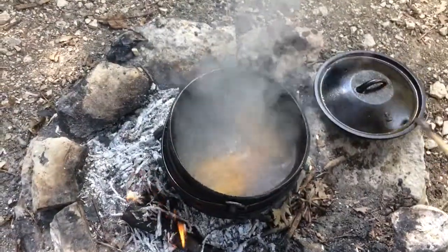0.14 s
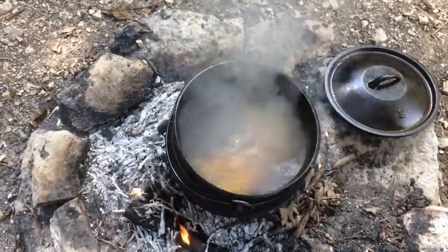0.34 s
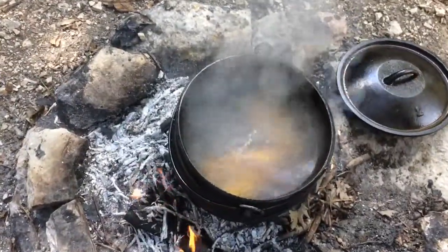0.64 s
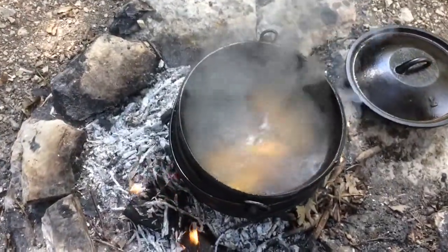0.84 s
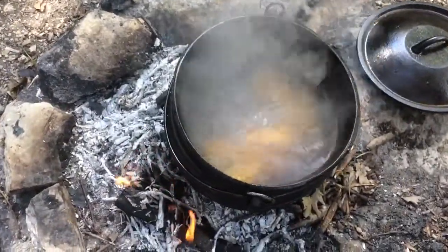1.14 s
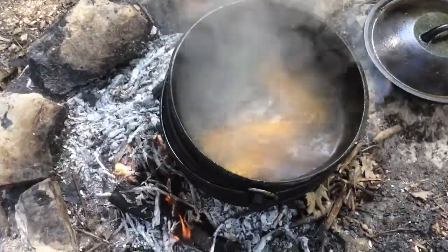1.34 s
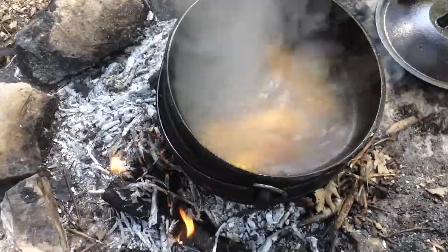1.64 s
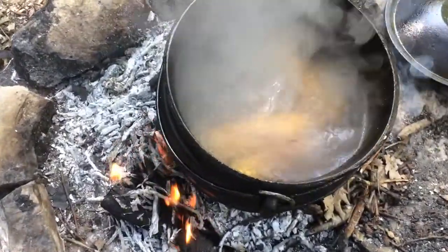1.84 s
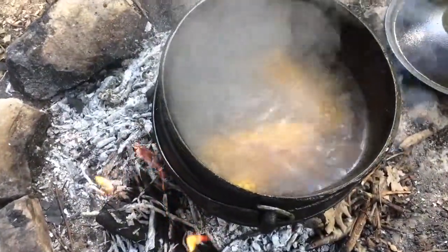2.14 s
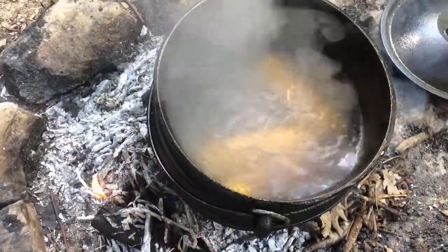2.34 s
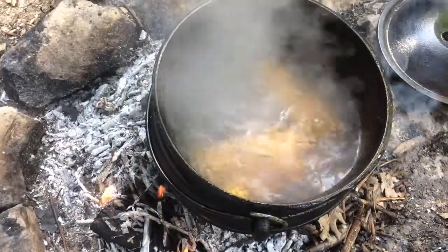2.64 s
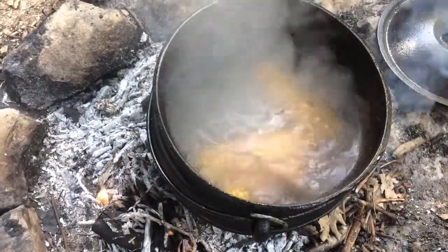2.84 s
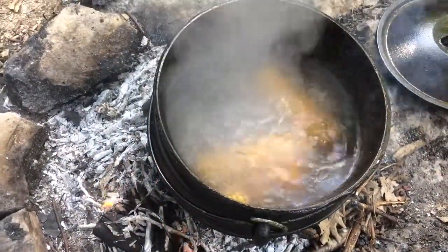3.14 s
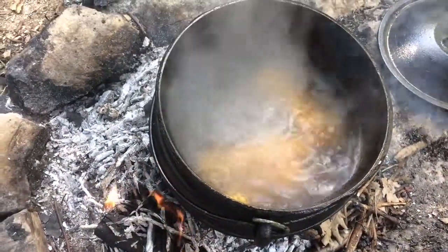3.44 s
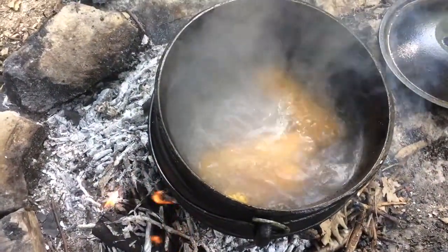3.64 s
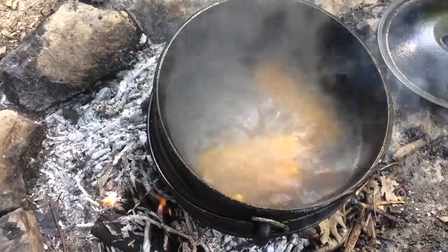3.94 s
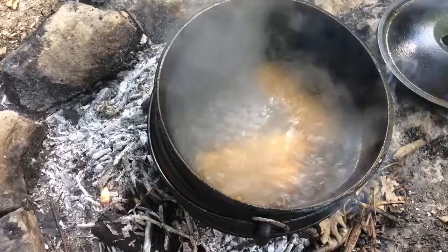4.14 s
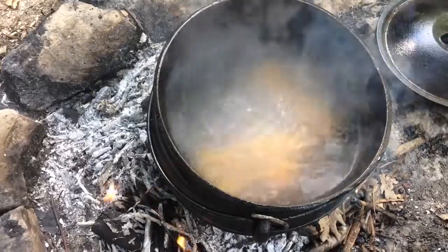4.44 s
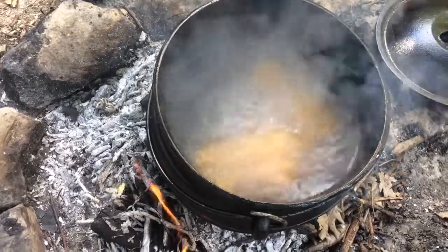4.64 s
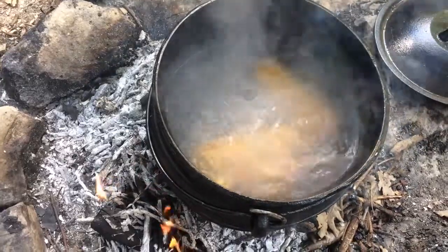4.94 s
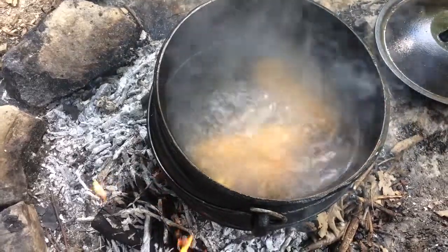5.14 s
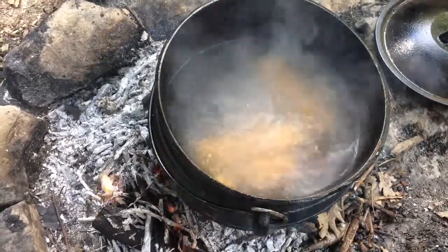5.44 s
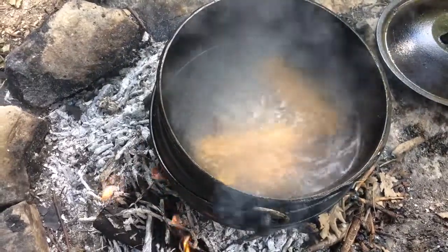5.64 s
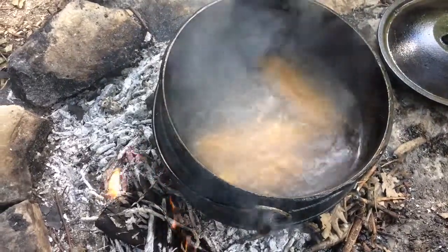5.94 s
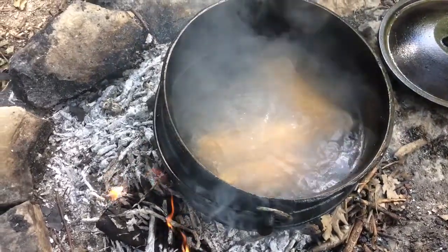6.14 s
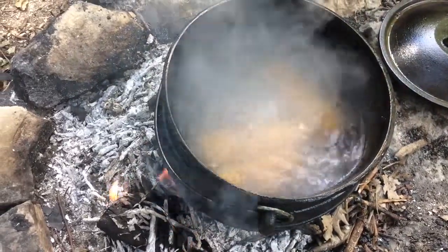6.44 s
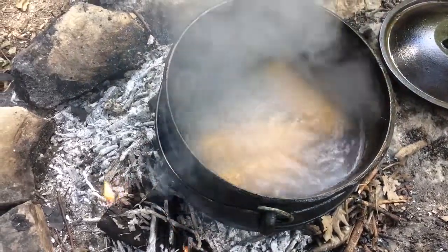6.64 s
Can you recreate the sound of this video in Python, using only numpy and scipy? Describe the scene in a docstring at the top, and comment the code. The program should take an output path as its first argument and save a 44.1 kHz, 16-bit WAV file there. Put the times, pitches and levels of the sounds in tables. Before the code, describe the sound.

Opening with a faint scrape and a bright, short iron clank, a heavy lid wobbles to rest in ever faster, softer knocks. After that, boiling takes over: quiet bubbling, irregular round gurgles and a steady hiss that grows slightly. Dry crackles from a wood fire pop at random, thickest near the end. Outdoors, close microphone, little echo.

```python
"""Stew pot over a wood fire

A cast-iron pot boils outdoors; its lid has just been set on the ground. Struck and rubbed iron modes
make a stick's scrape and the clanks; the rim rocks to rest in ever quicker knocks, with damped sines for
the air beneath. Big bubbles plop as gliding sines with wet noise; swarms of small resonators make the
churn and fizz. Noise bursts make the snaps and spits of the embers, over soft banded noise for the air."""
import sys
import numpy as np
from scipy import signal
from scipy.io import wavfile

SR = 44100
rng = np.random.default_rng(int(sys.argv[2]) if len(sys.argv) > 2 else 0)


def wav_out(sig):
    """Save sig, one row per channel (or a flat mono array), as 16-bit PCM at SR to the path in sys.argv[1]."""
    wavfile.write(sys.argv[1], SR, np.round(np.clip(np.atleast_2d(sig).T, -1, 1) * 32767).astype(np.int16))


N = 299439
T = np.arange(N) / SR

# blow on the lid handle, then jolts as the lid rocks: start_s, level_db
CLANKS = [(.1603, -42), (.1803, -18.5), (.4545, -56), (.707, -68)]


def from_db(db):
    """Decibels to gain."""
    return 10 ** (np.asarray(db) / 20)


def rms_one(x):
    """Scale to unit rms."""
    return x / np.sqrt(np.mean(x ** 2) + 1e-20)


def in_time(rows):
    """Level rows (start_s, level_db) joined by straight lines."""
    start_s, level_db = np.transpose(rows)
    return np.interp(T, start_s, level_db)


def at_hz(points, hz):
    """Read a spectrum on a log-frequency axis."""
    point_hz, level_db = np.transpose(points)
    return np.interp(np.log(hz), np.log(point_hz), level_db)


def add(out, start_s, sound):
    """Mix a sound in at its start time."""
    i = max(0, round(start_s * SR))
    out[i:i + len(sound)] += sound[:N - i]


def band(x, low_hz, high_hz):
    """Causal band-pass, edges kept within the usable range."""
    edges_hz = np.clip([low_hz, high_hz], [10, 20], [.42 * SR, .45 * SR])
    sos = signal.butter(2, edges_hz, "band", fs=SR, output="sos")
    return signal.sosfilt(sos, x + 1e-18)  # offset avoids denormals


def drift(rate_hz):
    """Slow random curve of unit rms: noise through a double pole, one point per 40 samples."""
    r = np.exp(-80 * np.pi * rate_hz / SR)
    noise = rng.standard_normal(N // 40 + 2002)
    slow = signal.lfilter([1], [1, -2 * r, r * r], noise)[2000:]  # drop the settling
    return np.interp(np.arange(N) / 40, np.arange(len(slow)), rms_one(slow))


def fade(t, t60_s):
    """Exponential decay, 60 dB in t60_s."""
    return np.exp(-np.log(1000) * t / max(t60_s, 1e-4))


def ring(force, hz, t60_s):
    """One mode as a two-pole resonator: a unit click starts a decaying sine of height 1."""
    r, w = fade(1 / SR, t60_s), 2 * np.pi * hz / SR
    return signal.lfilter([0, np.sin(w)], [1, -2 * r * np.cos(w), r * r], force + 1e-18)


def clicks(per_s, spread_db):
    """Random clicks of either sign, most small and a few large."""
    size = from_db(spread_db * np.minimum(rng.exponential(1, N), 2.8))
    return size * rng.choice([-1, 1], N) * (rng.random(N) < per_s / SR)


def swarm_voice(hz, per_s, spread_db, cycles):
    """Random clicks, differentiated, set one resonator ringing for some cycles."""
    force = np.diff(clicks(per_s, spread_db), prepend=0)
    return ring(force, hz, cycles / hz)


def burst(low_hz, high_hz, t60_s):
    """Dying puff of band noise, scaled to an rms of about 1 at its start."""
    envelope = fade(T[:SR // 6], t60_s)
    noise = rng.standard_normal(len(envelope)) * envelope
    puff = band(noise, low_hz, max(high_hz, 1.2 * low_hz))
    return puff * np.sqrt(np.sum(envelope ** 2) / np.sum(puff ** 2))


def wash(colour, patchy_db):
    """Smooth noise in half-octave bands, each level wavering by patchy_db rms."""
    out, white = np.zeros(N), rng.standard_normal((2, N))
    edges_hz = np.geomspace(22, 17000, 20)
    for k, (low_hz, high_hz) in enumerate(zip(edges_hz, edges_hz[1:])):
        level_db = at_hz(colour, np.sqrt(low_hz * high_hz)) + patchy_db * drift(rate_hz=6.2)
        out += from_db(level_db) * band(white[k % 2], low_hz, high_hz)  # neighbours use separate noise
    return rms_one(out)


def bubbles(colour, low_hz, high_hz, per_s, spread_db, cycles, clump_db, count):
    """Swarm of small bubbles of many sizes, each ringing a few cycles, the whole swelling in clumps."""
    out, surge = np.zeros(N), from_db(clump_db * drift(rate_hz=22))
    for hz in np.geomspace(low_hz, min(high_hz, .45 * SR), count):
        voice = rms_one(swarm_voice(hz, per_s / count, spread_db, cycles))
        out += from_db(at_hz(colour, hz)) * np.sqrt(hz) * voice  # colour is per Hz
    return rms_one(out * surge)


def rocking(count=17):
    """Rim knocks as (start_s, level_db): two to a swing, the swings ever shorter and softer."""
    first_swing_s, keep_share, soil_drag_s = .162, .9374, .00086
    first_db, fade_db = -33, 17.5  # loss by the last swing, slow at first and then steep
    rebound_share, rebound_db = .37, -4.5  # far side of the rim: this far into the swing, softer
    k = np.arange(count)
    swing_s = first_swing_s * keep_share ** k - soil_drag_s * k
    start_s = np.cumsum(swing_s) - swing_s
    level_db = first_db - fade_db * (k / k[-1]) ** 2
    return [*zip(start_s, level_db), *zip(start_s + rebound_share * swing_s, level_db + rebound_db)]


def blows(rows, vary_db):
    """A click per row, its strength varying with the point of contact."""
    force = np.zeros(N)
    for (start_s, level_db), luck in zip(rows, rng.standard_normal(len(rows))):
        add(force, start_s, from_db([level_db + vary_db * luck]))
    return force


def lid(low_cut_hz=200):
    """Handle blows, rim knocks and the rubbing stick reach the same iron modes with their own weights."""
    # iron lid modes in close pairs: pitch_hz, t60_s, handle_blow_db, rim_knock_db, rub_db
    lid_modes = [(1023, .09, -16, -32, -30), (1680, .05, -22, -40, -30), (1880, .05, -13, -34, -30),
                 (1761, .15, -9.5, -26, -17), (1763, .5, -26, -35, -13), (2256, .45, -31, -38, -7),
                 (2277, .2, -2.5, -23, -22), (2292, .3, -24, -34, -30), (2746, .6, -26, -42, -15),
                 (2763, .15, -12, -36, -20), (2989, .29, -14, -42, -24), (3012, .1, -10, -39, -30),
                 (3082, .07, -12, -45, -30), (3353, .13, -21, -50, -30), (3385, .29, -12, -47, -16),
                 (3950, .09, -27, -52, -16), (4027, .25, -27, -55, -14), (4318, .17, -18, -54, -22),
                 (5002, .35, -50, -62, -6), (5893, .35, -48, -62, -5), (6935, .25, -36, -62, -15),
                 (7052, .22, -35, -62, -24), (7910, .3, -48, -62, -10), (9663, .25, -50, -62, -10)]
    # stick sliding along the handle: start_s, level_db
    scrape_rows = [(0, -41), (.04, -51), (.07, -39.5), (.11, -65), (.15, -36), (.18, -83)]
    out, knocks = np.zeros(N), rocking()
    pressure = from_db(in_time(scrape_rows)) * (T < scrape_rows[-1][0])
    for k, (hz, t60_s, handle_db, rim_db, rub_db) in enumerate(lid_modes):
        force = from_db(handle_db) * blows(CLANKS, vary_db=1.0)
        force += from_db(rim_db) * blows(knocks, vary_db=4.0)
        force += from_db(rub_db - 32.5) * pressure * rng.standard_normal(N)
        out += (-1) ** (k // 3) * ring(force, hz, t60_s)  # groups of modes move in opposite senses
    return band(out, low_cut_hz, 16000)


def dome_knocks(rise_per_s=0.033, wobble=0.042, grit_db=-17):
    """Each knock crushes soil and sounds the air under the dome, tending higher as the lid settles."""
    # air under the lid's dome: nominal_hz, t60_s, level_db
    dome_modes = [(203, 0.05, -13.5), (296, 0.044, -9), (705, 0.048, -25), (926, 0.079, -12),
                  (990, 0.046, -0.5), (1010, 0.016, -28)]
    out, t, knocks = np.zeros(N), T[:SR // 6], rocking()
    for (start_s, level_db), luck in zip(knocks, rng.standard_normal(len(knocks))):
        tune = 1 + rise_per_s * start_s + wobble * luck
        hollow = np.zeros(len(t))
        for hz, t60_s, mode_db in dome_modes:
            hollow += from_db(mode_db) * np.sin(2 * np.pi * hz * tune * t) * fade(t, t60_s)
        grit = burst(550, 1700, t60_s=.05)
        add(out, start_s, from_db(level_db) * (hollow + from_db(grit_db) * grit))
    return band(out, 200, 4400)


def welling():
    """Gains of large and small bubbles: a steady simmer plus surges that swell, hold and die away."""
    # broth wells up around the big bubbles: start_s, hold_s, level_db, large_over_small_db
    surge_rows = [(0.6, 0.14, -53, 2), (0.783, 0.04, -46.5, -8.5), (1.477, 0.27, -59.5, -3),
                  (2.265, 0.16, -54.5, 0.5), (2.879, 0.11, -53.5, 2.5), (3.202, 0.081, -59.5, -17),
                  (3.434, 0.02, -51.5, -3), (3.546, 0.035, -55.5, -4), (4.238, .13, -53.5, -3.5),
                  (4.955, 0.024, -41.5, -2.5), (5.545, 0.063, -45, 0.5), (5.636, 0.23, -52, -4.5),
                  (5.795, 0.18, -51.5, 4.5), (6.61, 0.12, -52.5, -8)]
    attack_s, t60_s = 0.011, 0.14
    simmer_db, simmer_large_over_small_db = -63.5, -3
    swells = [(from_db(simmer_db), simmer_large_over_small_db)]
    for start_s, hold_s, level_db, large_db in surge_rows:
        attack = np.clip(1 + (T - start_s) / attack_s, 0, 1)  # full at start_s
        release = fade(np.clip(T - start_s - hold_s, 0, 1), t60_s)
        swells.append((from_db(level_db) * attack * release, large_db))
    large_power = sum(gain ** 2 / (1 + from_db(-large_db) ** 2) for gain, large_db in swells)
    small_power = sum(gain ** 2 / (1 + from_db(large_db) ** 2) for gain, large_db in swells)
    return np.sqrt(large_power), np.sqrt(small_power)


def churning(split_hz=390):
    """Swarms of large and small bubbles share the level as the broth wells up."""
    # churn spectrum: pitch_hz, level_db_per_hz
    churn_colour = [(40, -18), (90, -3), (160, 1.5), (300, -6), (600, -13.5), (1200, -19.5), (2400, -23),
                    (5000, -40)]
    large_gain, small_gain = welling()
    large = bubbles(churn_colour, 124.0, split_hz, per_s=260, spread_db=3.5, cycles=8.9,
                    clump_db=1.5, count=7)
    small = bubbles(churn_colour, 1.09 * split_hz, 3130, per_s=900, spread_db=4.5, cycles=11.3,
                    clump_db=1.1, count=12)
    return large_gain * large + small_gain * small


def pot(x):
    """The hollow above the broth adds its resonances to every bubble."""
    # air above the broth: pitch_hz, width_hz, level_db
    pot_modes = [(175, 32, -11), (262, 20, -18), (305, 16, -20), (428, 8, -47), (660, 72, -7)]
    out = x.copy()
    for hz, width_hz, level_db in pot_modes:
        r = np.exp(-np.pi * width_hz / SR)
        poles = [1, -2 * r * np.cos(2 * np.pi * hz / SR), r * r]
        out += from_db(level_db) * (1 - r * r) / 2 * signal.lfilter([1, 0, -1], poles, x)
    return out


def ticks(low_hz, high_hz, per_s, spread_db, cycles, count=14):
    """Tiny ticks in the embers, shared among resonators of different pitch."""
    out = np.zeros(N)
    for hz in np.geomspace(low_hz, min(high_hz, .45 * SR), count):
        out += np.sqrt(hz) * swarm_voice(hz, per_s / count, spread_db, cycles)
    return rms_one(out)


def sizzle():
    """Fine surface bubbles, ember ticks and smooth noise follow one level curve."""
    # fizz spectrum: pitch_hz, level_db_per_hz
    fizz_colour = [(1000, -13), (2200, -6.5), (3500, -2), (5000, -1), (8000, 2.5), (12000, 3), (15500, 3)]
    # surface fizz curve: start_s, level_db
    fizz_rows = [(0.25, -54.5), (1.05, -53), (2.56, -52.5), (4.95, -49.5), (5.22, -52.5), (6.08, -48.5),
                 (6.48, -51.5), (6.79, -51)]
    fizz = bubbles(fizz_colour, 2620, 12300, per_s=4300, spread_db=7.5, cycles=4.0,
                   clump_db=5.5, count=20)
    high_ticks = ticks(6900, 14100, per_s=280, spread_db=6.5, cycles=11.4)
    low_ticks = ticks(3300, 8000, per_s=36, spread_db=3.0, cycles=22.0)
    mix = from_db(-4) * fizz + from_db(-4.5) * high_ticks + from_db(-10) * low_ticks
    mix += from_db(-3.5) * wash(fizz_colour, patchy_db=0.0)
    return from_db(in_time(fizz_rows) + 0.5) * mix


def outdoor_air(level_db=-62):
    """Still outdoor air as soft noise with wavering bands."""
    # air spectrum: pitch_hz, level_db
    air_colour = [(25, -4.5), (60, 4), (150, 4.5), (500, 3), (1200, 0), (3000, -5), (15000, -13.5)]
    return from_db(level_db) * wash(air_colour, patchy_db=3.0)


def clank_grit(rattle_db=-17, rattle_t60_s=0.1, rasp_db=-23, rasp_t60_s=0.12):
    """A blow on the handle drives the rim into the gravel: a dull rattle and a thin rasp."""
    out = np.zeros(N)
    for start_s, level_db in CLANKS:
        rattle = from_db(rattle_db) * burst(860, 1470, rattle_t60_s)
        rasp = from_db(rasp_db) * burst(3300, 10700, rasp_t60_s)
        add(out, start_s, from_db(level_db) * (rattle + rasp))
    return out


def plops(cycles=8.15, glide=0.28, cavity_db=6.0, slosh_db=-8, thud_db=-1):
    """A bursting dome rings a few cycles, gliding up as its mouth opens, and broth falls back."""
    # big bubbles: start_s, level_db, nominal_hz, spatter_db, relative_thud_db
    plop_rows = [(0.634, -44.5, 630, -4, -2), (0.747, -38.5, 298, -5, -1), (0.761, -30.5, 300, -16, -13),
                 (0.779, -29, 277, -6, -5), (1.497, -45.5, 353, -5, -0.5), (2.272, -41, 725, -12, -2),
                 (2.495, -43.5, 177, -22, -1), (2.877, -37.5, 610, -27, -4), (2.91, -39.5, 297, -15, -17),
                 (3.435, -49, 297, -11, 2), (3.46, -48, 286, -9, 3), (3.559, -39.5, 384, -9.5, -10),
                 (4.192, -36, 420, -13, 0.5), (4.351, -43.5, 1070, -8, -17), (4.954, -39, 427, -13, -3),
                 (4.961, -32.5, 454, -23, -27), (4.988, -38.5, 210, -18, -6),
                 (5.1969, -41.5, 1180, -7, -21), (5.544, -43, 292, -20, 4), (5.575, -38, 500, -31, 0),
                 (5.587, -36, 182, -22, -2), (5.812, -37.5, 1190, -0.5, -4), (6.052, -41.5, 864, -18, -19),
                 (6.614, -41.5, 910, -5, -24), (6.691, -31.5, 425, -18, -14), (6.77, -29, 805, -37, -35)]
    out, t = np.zeros(N), T[:SR // 6]
    opening = 1 - np.exp(-t / .0006)
    for start_s, level_db, hz, spatter_db, deep_db in plop_rows:
        life_s = cycles / hz
        pitch_hz = hz * (1 + glide * (np.minimum(t / life_s, 1) * 2 - .5))
        tone = np.sin(2 * np.pi * np.cumsum(pitch_hz) / SR)
        cavity = from_db(cavity_db) * tone * fade(t, life_s)
        spatter = from_db(spatter_db) * burst(600, 1340, t60_s=0.05)
        slosh = from_db(slosh_db) * burst(0.41 * hz, 1.83 * hz, t60_s=0.045)
        thud = from_db(deep_db + thud_db) * burst(104, 218, t60_s=0.044)
        add(out, start_s, from_db(level_db) * opening * (cavity + spatter + slosh + thud))
    return band(out, 130, 6000)


def snaps(skirt_db=-17, knock_db=-7, tail_db=-27):
    """Steam breaks the wood: a sharp crack, the splinter's own note, a faint scatter off the stones."""
    # ember snaps: start_s, level_db, low_hz, high_hz, t60_s
    snap_rows = [(0.7771, -21.5, 2120, 7300, 0.016), (0.895, -41.5, 4950, 11800, 0.021),
                 (1.0123, -27.5, 1160, 4870, 0.027), (1.5075, -36, 2300, 9900, 0.013),
                 (1.601, -22, 6700, 12400, 0.0072), (2.041, -37, 7240, 13200, 0.012),
                 (3.0709, -19, 8550, 11800, 0.0055), (3.4604, -41.5, 1390, 2530, 0.06),
                 (5.1954, -31.5, 980, 1880, 0.012), (5.4003, -34, 5500, 12900, 0.011),
                 (5.812, -23.5, 1800, 8900, 0.06), (5.8182, -26, 2370, 8550, 0.032),
                 (5.8333, -33.5, 2400, 8400, 0.1), (5.9105, -39.5, 3600, 11700, 0.054),
                 (6.013, -34, 6200, 11800, 0.04), (6.3048, -27.5, 4800, 9300, 0.048),
                 (6.3828, -36.5, 6900, 11000, 0.013), (6.3954, -43.5, 2270, 9700, 0.082),
                 (6.5057, -23, 2630, 12800, 0.039), (6.709, -43, 4460, 11900, 0.081),
                 (6.738, -39.5, 5300, 14000, 0.033), (6.773, -37.5, 3170, 13900, 0.074)]
    out = np.zeros(N)
    for start_s, level_db, low_hz, high_hz, t60_s in snap_rows:
        crack = burst(low_hz, high_hz, t60_s)
        skirt = from_db(skirt_db) * burst(low_hz / 2, 21000, t60_s)
        splinter = from_db(knock_db) * burst(0.902 * low_hz, 1.17 * low_hz, t60_s * 0.74)
        scatter = from_db(tail_db) * burst(low_hz / 2, high_hz, min(5 * t60_s, .2))
        add(out, start_s, from_db(level_db) * (crack + skirt + splinter + scatter))
    return out


def spits(count=64, per_s=3.9):
    """Lesser snaps at random moments, each with its own strength and brightness."""
    base_db, spread_db = -46.5, 9
    low_hz, low_octaves, high_hz, t60_s = 4060, 1, 12500, 0.021
    out = np.zeros(N)
    for when, chance, size, bright in rng.random((count, 4)):
        if chance < per_s * T[-1] / count:  # thins the candidates to per_s on average
            crack = burst(low_hz * 2 ** (low_octaves * bright), high_hz, t60_s)
            level_db = base_db + spread_db * (2 * size - 1.5)
            add(out, when * T[-1], from_db(level_db) * crack)
    return out


def scene():
    """Lid, broth and fire over the still outdoor air."""
    iron = lid() + dome_knocks() + clank_grit()
    broth = pot(churning() + from_db(3.4) * plops())
    fire = snaps() + spits()
    return (iron + broth + sizzle() + fire + outdoor_air())[None]


def record(dry):
    """Steep low-pass on the top."""
    sos = signal.ellip(12, .1, 80, 15600, fs=SR, output="sos")  # order, ripple dB, stop dB, cutoff Hz
    return signal.sosfilt(sos, dry)


dry = scene()
out = record(dry)
wav_out(out)
```